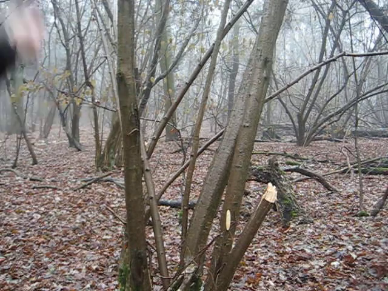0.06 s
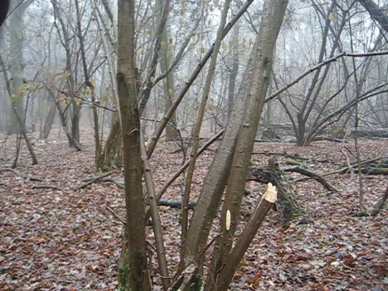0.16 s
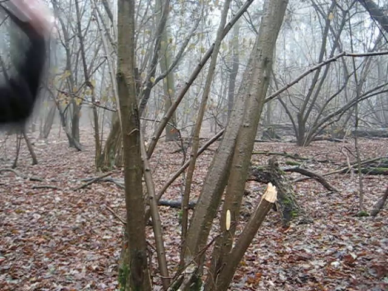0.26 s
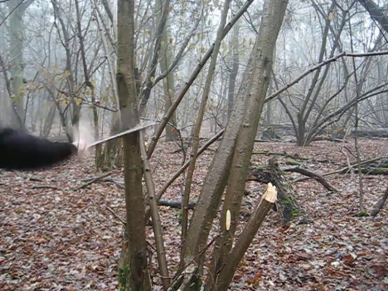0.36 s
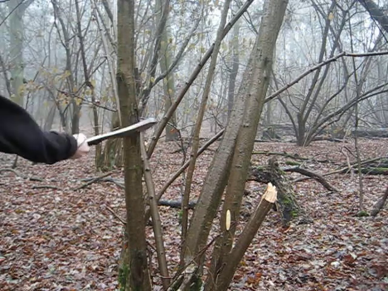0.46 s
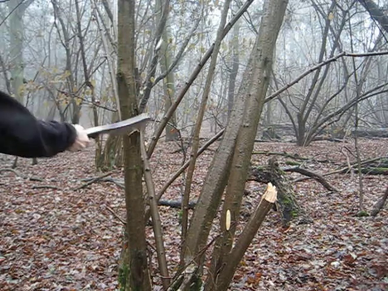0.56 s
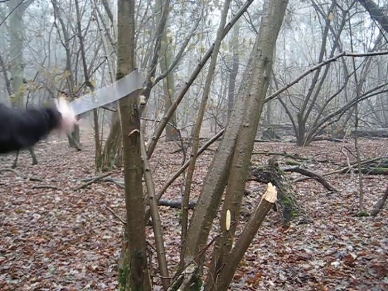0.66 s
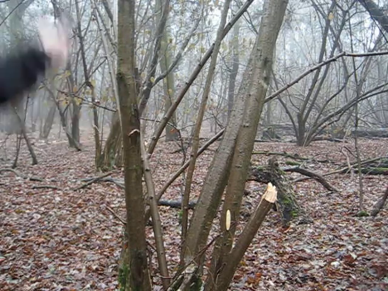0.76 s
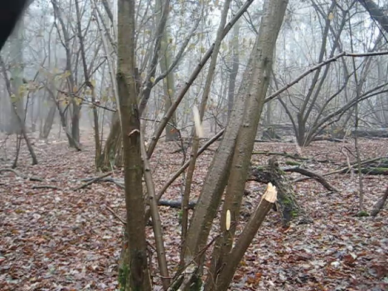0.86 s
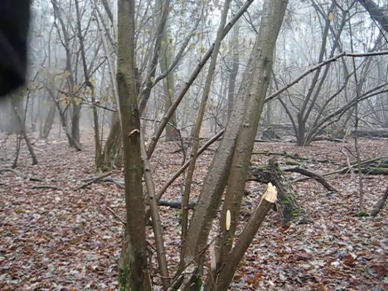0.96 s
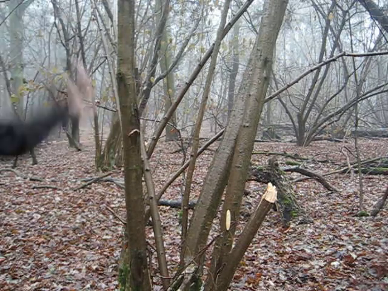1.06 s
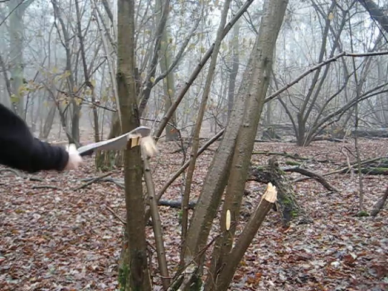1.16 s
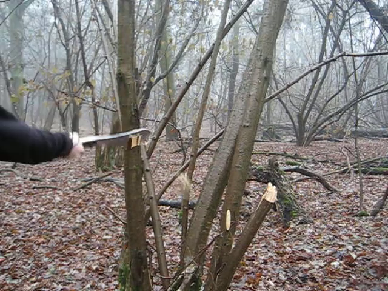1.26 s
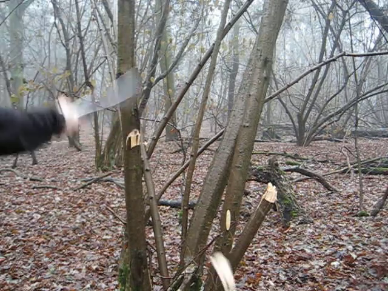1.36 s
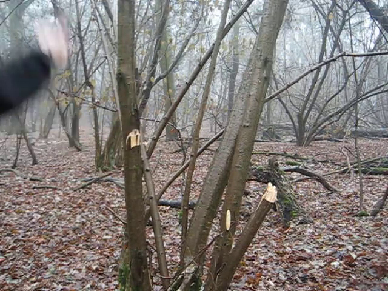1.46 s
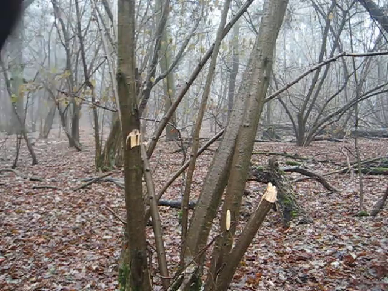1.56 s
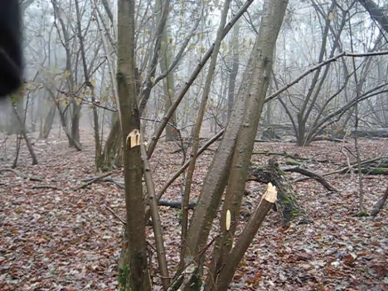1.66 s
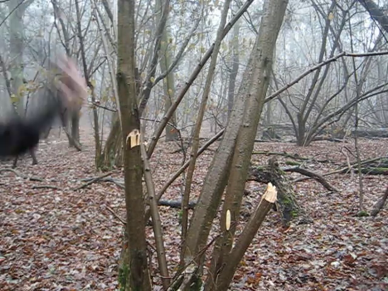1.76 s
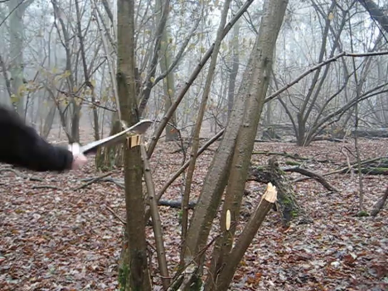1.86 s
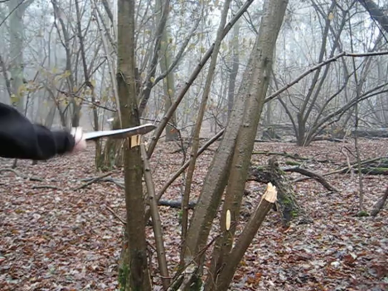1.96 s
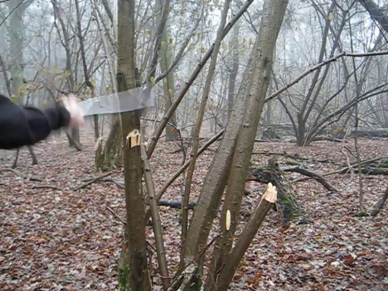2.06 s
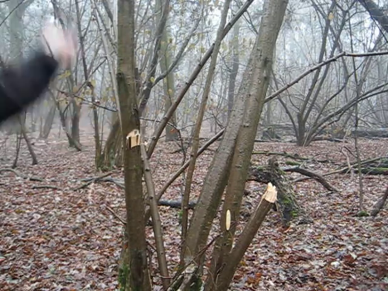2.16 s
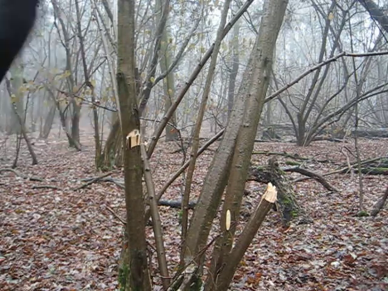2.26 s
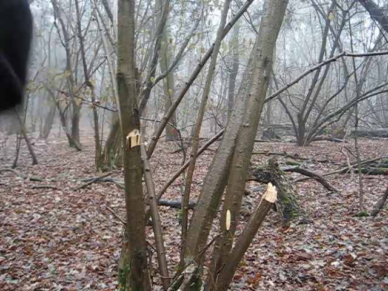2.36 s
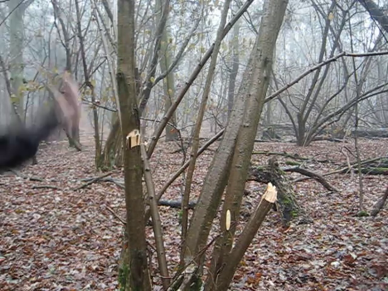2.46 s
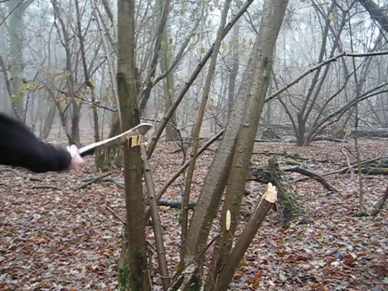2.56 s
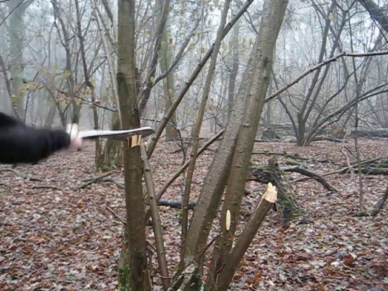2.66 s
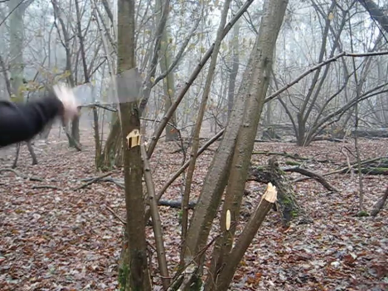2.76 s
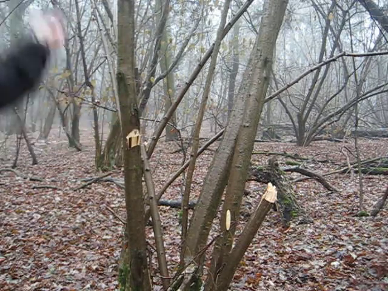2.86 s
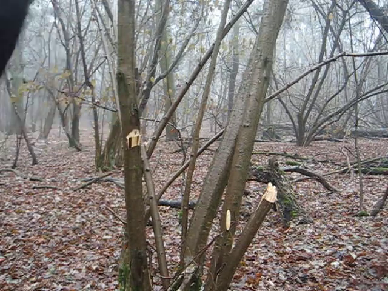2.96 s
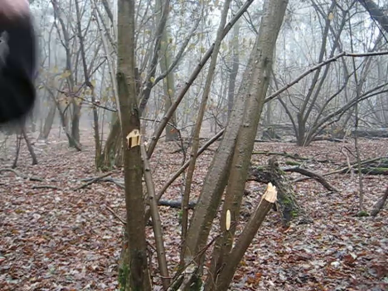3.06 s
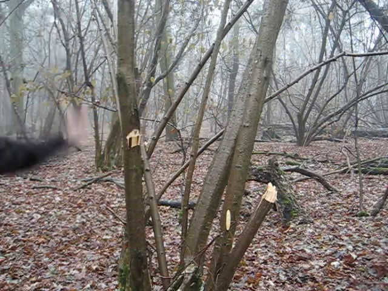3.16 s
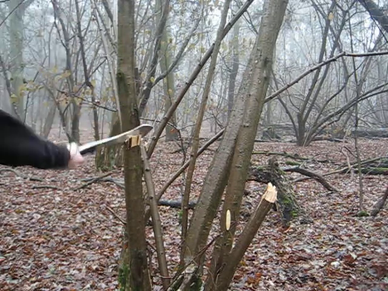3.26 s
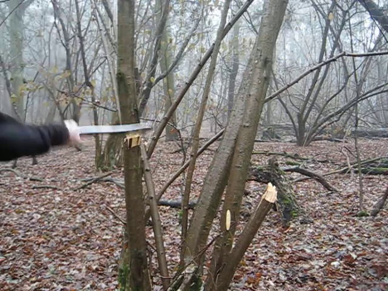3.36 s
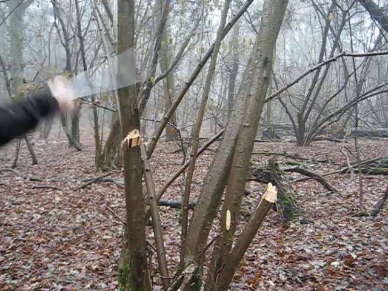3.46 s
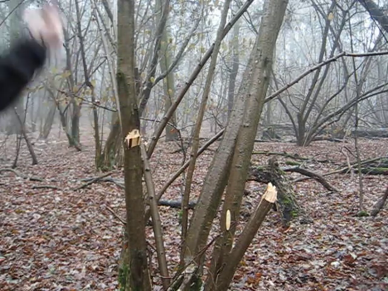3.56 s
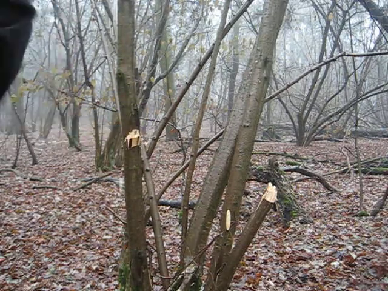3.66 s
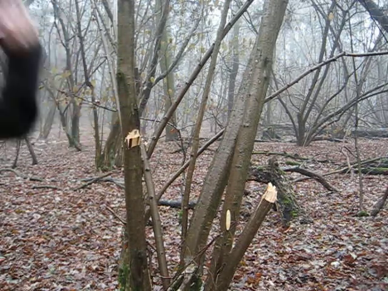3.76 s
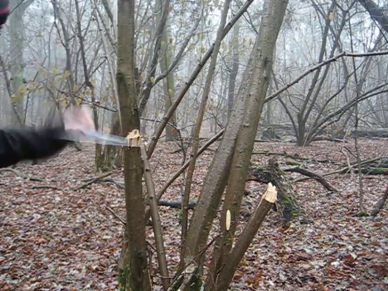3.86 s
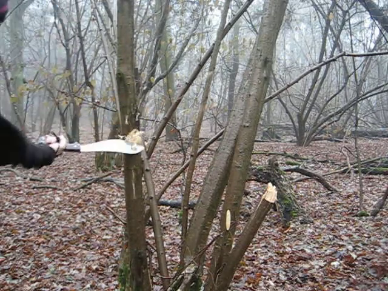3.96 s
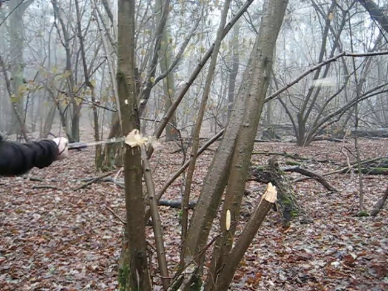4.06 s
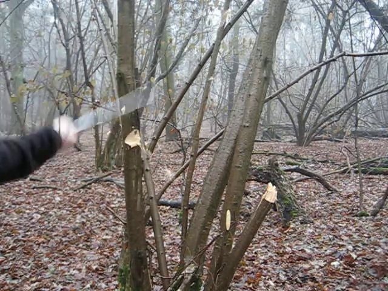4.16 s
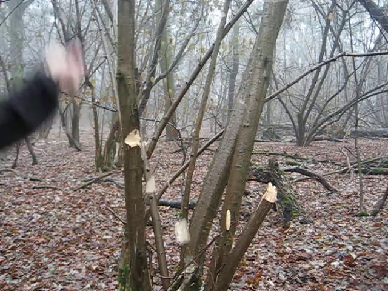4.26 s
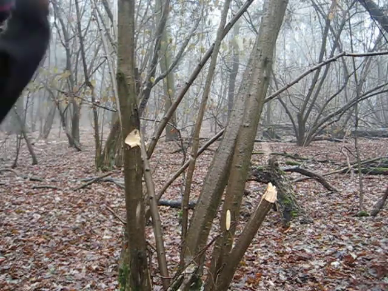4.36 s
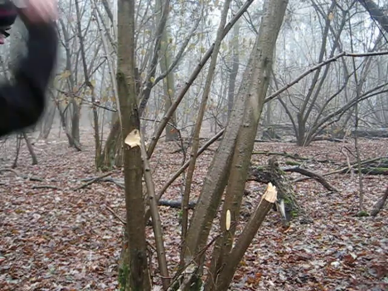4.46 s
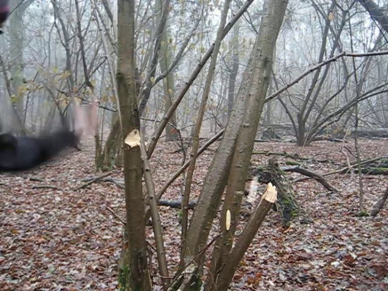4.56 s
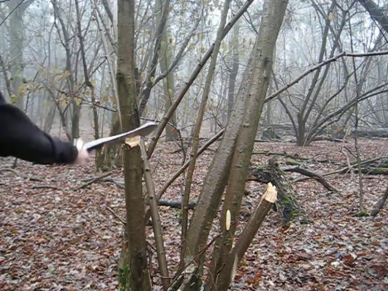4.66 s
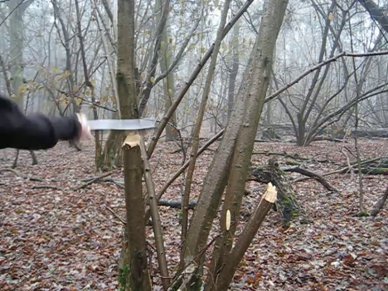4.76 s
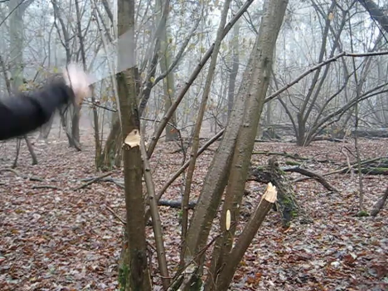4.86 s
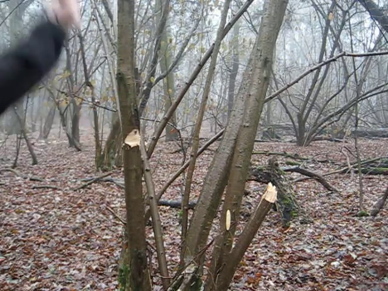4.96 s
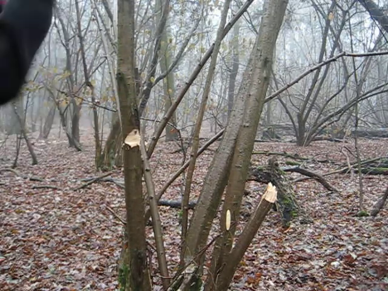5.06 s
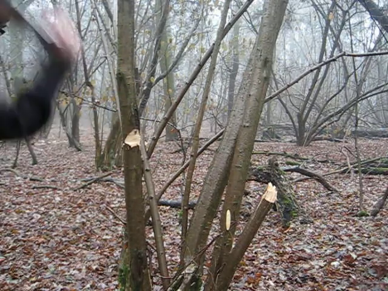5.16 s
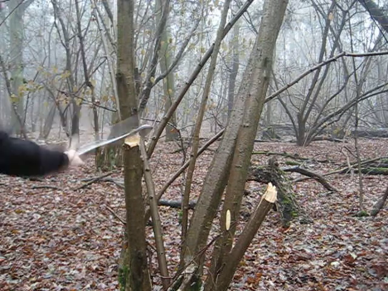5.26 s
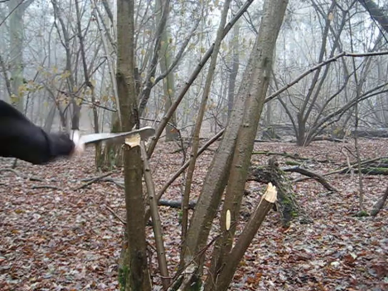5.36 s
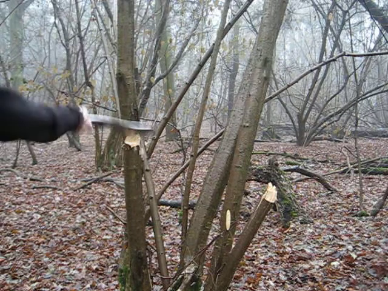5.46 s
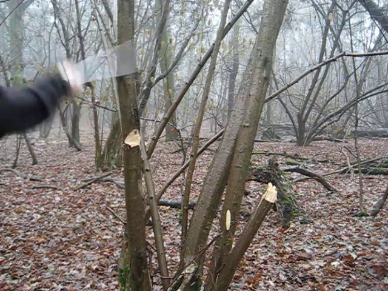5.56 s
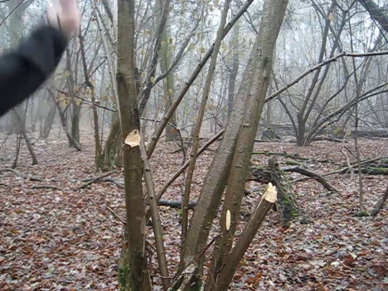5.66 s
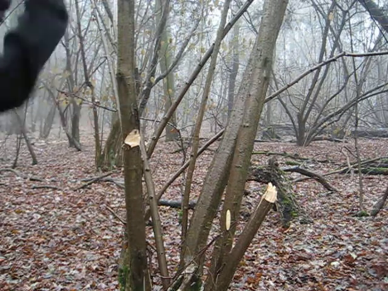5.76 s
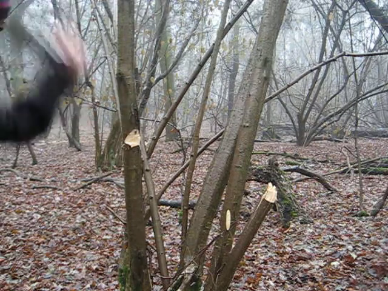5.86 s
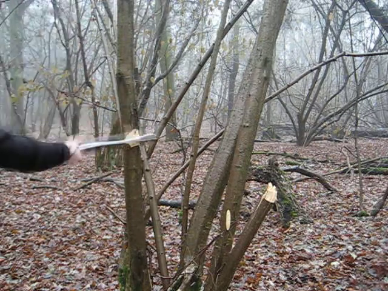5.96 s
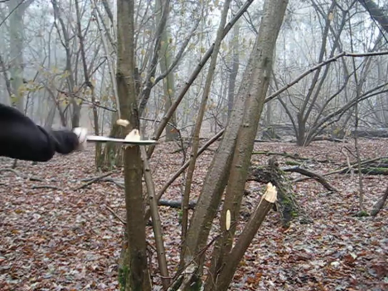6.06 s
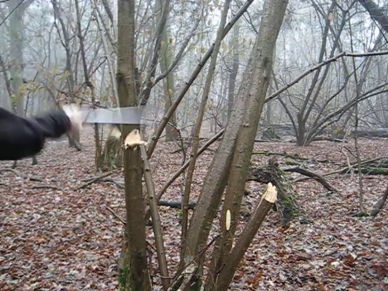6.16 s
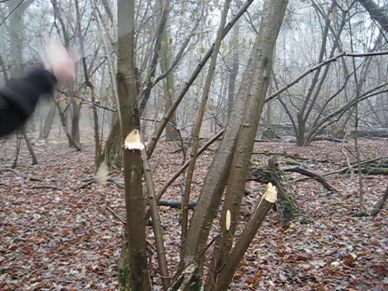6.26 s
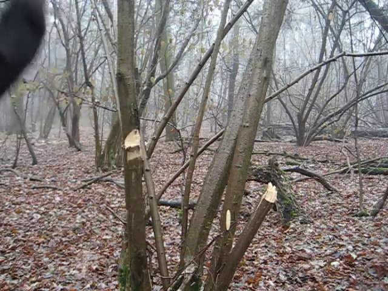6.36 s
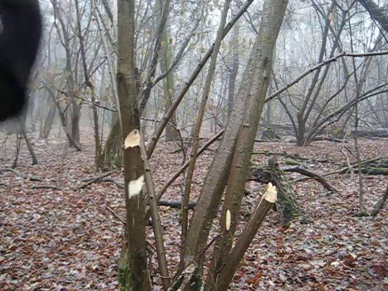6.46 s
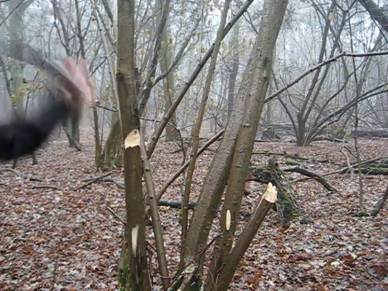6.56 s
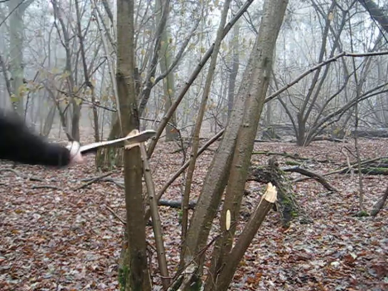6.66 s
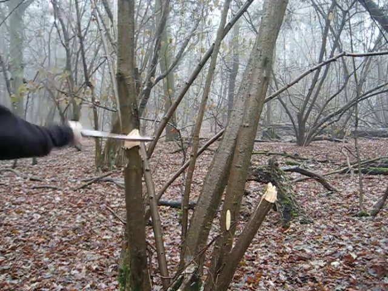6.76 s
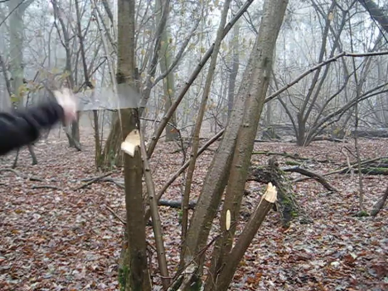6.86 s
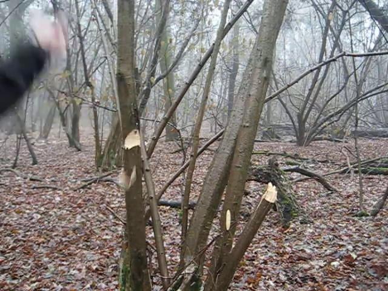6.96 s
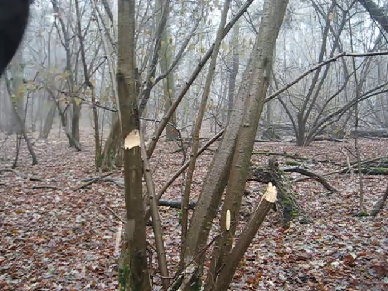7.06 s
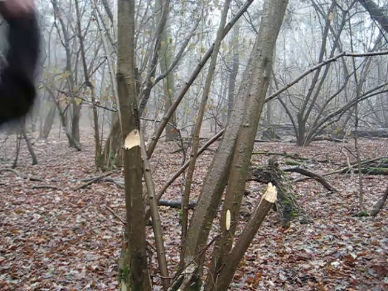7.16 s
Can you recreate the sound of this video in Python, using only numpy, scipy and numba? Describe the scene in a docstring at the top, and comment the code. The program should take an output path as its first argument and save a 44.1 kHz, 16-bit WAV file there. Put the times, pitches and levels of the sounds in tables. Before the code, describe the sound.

Ten hard chops of a long blade into a standing sapling, evenly spaced about 0.7 seconds apart. Each is a short, bright, distorted crack with a woody knock, followed by a hissy echo from surrounding trunks that seems to swell as the small camera microphone recovers. Between blows, drops and chips tick and scuff on dead leaves, over fine dripping patter and a faint far road.

```python
"""Chopping a sapling in a wet wood

A long blade chops a standing sapling in a quiet wood: torn fibres drive resonances, trunks around echo them.
Shaken drops and chips are short noises through leaf resonances, pings on hard things are decaying sines.
Shaped noise far off is a road, and nearer a patter with tiny damped sines in it. The microphone is a small
camera's: it overloads on each blow, cuts its gain and lets it climb back, so the echo seems to swell."""
import sys
import numpy as np
from scipy import signal
from scipy.fft import rfft, irfft, next_fast_len
from scipy.io import wavfile
from scipy.ndimage import uniform_filter1d, map_coordinates
from numba import njit

SR = 44100
rng = np.random.default_rng(int(sys.argv[2]) if len(sys.argv) > 2 else 0)


def unload_wav(signal):
    """Save mono or channel-first audio to the path in sys.argv[1] as 16-bit WAV at rate SR, clipped to [-1, 1]."""
    wavfile.write(
        sys.argv[1],
        SR,
        np.round(np.clip(np.atleast_2d(signal).T, -1, 1) * 32767).astype(np.int16),
    )


N = 318402  # samples

# Blows on the sapling. Each row: start in seconds, time the tear takes to fall 60 dB in seconds,
# thud level in dB, then levels in dB of the deep knock, wood body, hollow ring and bright crack.
BLOWS = [(0.3586, 0.019, -24, -11.5, -13, -34, 0), (1.1004, 0.021, -27, -9.5, -6.5, -11.5, -6.5),
         (1.813, .015, -25, -12.5, -7.5, -11.5, -5.5), (2.5032, 0.027, -37, -18.5, -10, -6, -11),
         (3.1874, 0.016, 3, -10, -4.5, -3, -4.5), (3.902, 0.017, -9, -16, -17.5, -40, -0.5),
         (4.594, 0.022, 5, -14, -1.5, -6.5, -1), (5.255, 0.012, 1.5, -4.5, 1, 2, 0),
         (5.957, 0.017, -29, -12.5, -9, -12.5, -6), (6.6253, 0.014, -38, -5.5, -8, -21, -1)]
# Resonances of the trunk, grouped by the part of the blow that drives them.
# Each row: frequency in Hz, width in Hz, level in dB over that part.
TRUNK_MODES = {"deep": [(720, 600, 0)], "body": [(1500, 1440, 0)], "hollow": [(2020, 270, 0)],
               "bright": [(3400, 1790, -.1), (6300, 4740, -.1), (11000, 6800, -8)]}
# Scatter from the trees around. Each row: frequency in Hz, time to fall 60 dB in seconds.
TREE_DECAY = [(300, 0.22), (1000, 0.5), (2000, 0.93), (4000, 0.63), (8000, 0.72), (14000, 0.68)]
# Louder drops and chips on leaves. Each row: start in seconds, level in dB,
# loudest pitch in octaves over BASE_HZ, time to fall 60 dB in seconds.
LEAF_DROPS = [(0.0214, -20.5, 0.67, 0.0074), (0.0834, -16, 0.73, 0.031), (0.1009, -14, 0.82, 0.017),
              (0.1618, -16, 1.05, 0.014), (0.1895, -23, 1.05, 0.012), (0.2326, -19, 1.3, 0.0076),
              (0.2753, -21, 1.2, 0.014), (0.631, -10.5, 0.63, 0.012), (0.7545, -15.5, 0.82, 0.022),
              (0.842, -15, 0.67, 0.01), (0.8587, -17.5, 0.8, 0.013), (0.9163, -21.5, 1.1, 0.01),
              (0.9555, -20, 1.2, 0.011), (1.2432, -16.5, 1, 0.017), (1.292, -17, 0.91, 0.013),
              (1.5262, -14, 1.7, 0.012), (1.6305, -15, 1.1, 0.021), (1.6525, -22, 0.76, 0.016),
              (1.7882, -12, 0.83, 0.024), (1.9928, -13.5, 1.14, 0.016), (2.098, -22, 1.56, 0.033),
              (2.3012, -16, 1.3, 0.0097), (2.3485, -17.5, 1, 0.01), (2.7067, -16, 0.51, 0.0082),
              (2.756, -26, 0.77, 0.009), (2.7871, -40, 0.8, 0.011), (2.81, -21.5, 0.74, 0.014),
              (2.8449, -22, 0.94, 0.014), (2.8683, -18, 0.77, 0.0099), (2.884, -20, 1.4, 0.014),
              (2.9253, -25, 0.93, 0.014), (2.9435, -25, 0.79, 0.014), (2.9748, -21.5, 0.89, 0.014),
              (3.0108, -16, 0.97, 0.015), (3.472, -23, 1.25, 0.014), (3.5149, -24, 1.7, 0.023),
              (3.6802, -21, 0.9, 0.014), (3.704, -19.5, 0.77, 0.02), (3.7199, -19, 0.98, 0.023),
              (3.7476, -16.5, 1, 0.0076), (3.7973, -19, 0.74, 0.012), (4.1807, -22, 0.97, 0.026),
              (4.2616, -14.5, 0.62, 0.024), (4.331, -22, 1.3, 0.014), (4.3386, -23, 0.9, 0.016),
              (4.349, -15.5, 1.2, 0.033), (4.425, -17, 1.5, 0.014), (4.4327, -3.5, 1.03, 0.012),
              (4.474, -15, 0.94, 0.016), (4.5124, -17, 1.9, 0.0076), (4.8083, -7.5, 1.01, 0.018),
              (4.9353, -17, 0.83, 0.022), (4.9556, -21, 0.92, 0.027), (5.057, -23, 1.25, 0.014),
              (5.1587, -18, 0.53, 0.02), (5.221, -14, 0.93, 0.019), (5.4805, -22, 0.91, 0.014),
              (5.4924, -15, 0.89, 0.021), (5.6648, -21, 0.93, 0.011), (5.8037, -16, 1.03, 0.013),
              (5.877, -21.5, 0.88, 0.026), (5.8924, -22, 0.96, 0.021), (5.9945, -1.5, 0.82, 0.02),
              (6.1252, -19.5, 1.6, 0.012), (6.1887, -23, 1.3, 0.014), (6.2015, -18.5, 0.55, 0.0087),
              (6.3041, -20.5, 0.83, 0.028), (6.329, -25, 1.5, 0.02), (6.349, -28, 1.4, 0.014),
              (6.359, -16.5, 0.54, 0.017), (6.376, -22.5, 1.5, 0.02), (6.4103, -22, 1.3, 0.014),
              (6.555, -8, 0.74, 0.029), (6.571, -15, 0.97, 0.012), (6.5863, -20, 0.87, 0.023),
              (6.5949, -22, 0.95, 0.019), (6.6434, -20, 1.05, 0.014), (6.9314, -16.5, 1.3, 0.017),
              (6.993, -19, 0.81, 0.033), (7.0317, -21, 1.3, 0.023), (7.0929, -13.5, 0.98, 0.024),
              (7.154, -15, 1.14, 0.017), (7.206, -19, 1.5, 0.014)]
# Chips sliding through the litter. Each row: start in seconds, level in dB,
# loudest pitch in octaves over BASE_HZ, length in seconds before the fade.
CHIP_SCUFFS = [(.059, -29.5, 0.63, 0.024), (0.182, -26.5, 0.96, 0.014), (0.276, -27.5, 1.4, 0.0093),
               (0.995, -32.5, 1.3, 0.043), (1.524, -18, 0.81, 0.018), (1.543, -26.5, 0.78, .035),
               (2.483, -26, 0.81, 0.0022), (3.154, -38, 1.7, 0.019), (4.332, -28, 1.2, 0.023),
               (4.581, -24, 0.65, .012), (6.554, -21, 0.91, 0.013)]
# Resonances of the dead leaves. Each row: frequency in Hz, width in Hz.
LEAF_MODES = [(3500, 7750), (7000, 3800), (11500, 8800)]
# Drops landing on something hard. Each row: start in seconds, which thing,
# level in dB of its low mode, level in dB of its high mode.
HARD_LANDINGS = [(.253, "a", -45, -32), (0.273, "b", -22, -27), (.805, "a", -39, -37),
                 (.917, "a", -57, -34), (.955, "a", -51, -32), (1.002, "b", -22, -29),
                 (1.650, "b", -55, -40), (2.206, "a", -33, -26.5), (2.208, "b", -34, -50),
                 (4.376, "b", -55, -30), (6.224, "b", -26, -35), (6.226, "a", -50, -31),
                 (6.297, "b", -31, -55), (6.521, "b", -41, -55), (6.934, "b", -28, -50)]
# Two hard things, two modes each. Each row: frequency in Hz, time to fall 60 dB in seconds.
HARD_MODES = {"a": [(6400, .045), (11200, .04)], "b": [(7700, .05), (12900, .045)]}
# Spectrum of the far road. Each row: frequency in Hz, relative density in dB per Hz.
ROAD_SPECTRUM = [(15, -52), (25, -31), (80, -15), (149, -18), (418, -11), (452, -11), (1000, -1.5),
                 (1240, -6), (1450, -8.5), (1600, -10.5), (2600, -29), (3380, -42), (5720, -120)]
# Spectrum of the dripping hiss. Each row: frequency in Hz, relative density in dB per Hz.
PATTER_SPECTRUM = [(1200, -10), (2000, 3), (3500, 3), (6000, 0), (8500, 2), (11000, -7.5), (14000, -6),
                   (15700, -12), (15950, -90)]
# Level of the hiss and patter; the loud start is the dying echo of an earlier blow.
# Each row: time in seconds, level in dB.
PATTER_LEVEL = [(0, -34.5), (.33, -34.5), (0.701, -39), (1.4, -43), (1.7, -39), (2.1, -43.5), (2.6, -42),
                (4, -43), (4.5, -39), (5.2, -43), (7.22, -40)]
# Camera electronics, ahead of the gain control. Each row: frequency in Hz, rms level in dB.
WHINE_TONES = [(15121, -60), (15150, -58)]
# Treble loss after the amplifier. Each row: frequency in Hz, gain in dB.
CAMERA_TREBLE = [(20, 0), (11000, 0), (14000, -4), (15700, -10), (16900, -22)]

TEAR_DB, ECHO_DB = 19, -13.5  # the tear, and the wood's answer; both ahead of the trunk resonances
KNOCK_DB, KNOCK_T60_S = 1, .07  # ring of the stem: level over the deep knock, time to fall 60 dB
BASE_HZ, OFF_PITCH_DB = 3000, 9.5  # loss of a leaf resonance one octave from the loudest pitch
FAINT_DB, FAINT_SPREAD_DB, FAINT_T60_S = -21, 5.5, 0.009  # loudest, spread below it, median decay
ROAD_DB = -35.5
TOP_HZ = 16984  # top of the band: nothing sounds above this


def amp(db):
    """dB to gain."""
    return 10 ** (np.asarray(db) / 20)


def unit(x):
    """Scaled to rms 1."""
    return x / np.sqrt(np.mean(x ** 2) + 1e-20)


def along(points, hz):
    """Values between (Hz, value) points, read on a log frequency axis."""
    f, v = np.transpose(points)
    return np.interp(np.log(hz + 1), np.log(f + 1), v)


def filtered(x, response):
    """x times a complex response of frequency, padded to keep ringing from wrapping round."""
    m = next_fast_len(x.shape[-1] + 8192)
    spectrum = rfft(x, m) * response(np.fft.rfftfreq(m, 1 / SR))
    return irfft(spectrum, m)[..., :x.shape[-1]]


def resonance(hz, width):
    """A causal resonance that leaves white noise at its rms."""
    gain = np.sqrt(SR / (np.pi * width))
    return lambda f: gain * 1j * f * width / (hz * hz - f * f + 1j * f * width)


def add(track, s, sound):
    """Mixes sound into track from second s."""
    part = track[round(s * SR):][:len(sound)]
    part += sound[:len(part)]


def chops():
    """Fibres tear for a few ms and drive the trunk resonances; the wood answers in the same colour."""
    out, t = np.zeros(N), np.arange(SR) / SR
    for s, length, thud_db, *part_db in BLOWS:
        colour = trunk_colour(part_db)
        onset = 1 - np.exp(-t / 0.0011)
        tear = amp(TEAR_DB - 60 * (t / length) ** 1.046) * onset * rng.standard_normal(SR)
        thud = amp(thud_db - 60 * t / 0.014) * np.sin(2 * np.pi * 120 * t)
        # the stem rings on briefly
        knock_env = amp(part_db[0] + KNOCK_DB - 60 * t / KNOCK_T60_S)
        knock = knock_env * np.sin(2 * np.pi * 760 * t + 3 * rng.random())
        blow_and_echo = filtered(tear + amp(ECHO_DB) * echo_tail(), colour)
        add(out, s, blow_and_echo + thud + knock)
    return out


def trunk_colour(part_db):
    """Response of the struck trunk: its resonances summed with alternating sign."""
    modes = [(hz, width, db + drive_db)
             for drive_db, part in zip(part_db, TRUNK_MODES.values())
             for hz, width, db in part]
    return lambda f: sum((-1) ** k * amp(db) * resonance(hz, width)(f)
                         for k, (hz, width, db) in enumerate(modes))


def echo_tail():
    """Scatter from many trunks: it builds up, then each frequency dies at its own speed."""
    hz, t, z = signal.stft(rng.standard_normal(SR), SR, nperseg=256)
    build_up = 1 - np.exp(-(t / 0.087) ** 2)
    far = amp(-60 * t / along(TREE_DECAY, hz)[:, None]) * build_up
    near = amp(3.5 - 60 * t / 0.14)  # ground and neighbouring stems
    lumps = amp(0.45 * rng.standard_normal(len(t)))  # single trunks stand out
    return signal.istft(z * lumps * (far + near), SR, nperseg=256)[1][:SR]


def litter():
    """A drop is a snap with a crackling puff, a scuff a held crackle; both sound through the leaves."""
    tracks = np.zeros((len(LEAF_MODES), N))
    drops = list(LEAF_DROPS) + faint_drops(count=120)
    shapes = [drop_shape(t60) for *_, t60 in drops]
    shapes += [scuff_shape(length) for *_, length in CHIP_SCUFFS]
    for (s, db, octaves, _), shape in zip(drops + list(CHIP_SCUFFS), shapes):
        for track, (hz, _) in zip(tracks, LEAF_MODES):
            add(track, s, amp(db + off_pitch(hz, octaves)) * shape)
    return sum((-1) ** k * filtered(track, resonance(*mode))
               for k, (track, mode) in enumerate(zip(tracks, LEAF_MODES)))


def drop_shape(t60):
    """The impact is a very short pulse, the puff behind it decaying noise."""
    t = np.arange(SR // 10) / SR
    snap = 2.6 * np.exp(-((t - .0002) / .00004) ** 2)
    return snap + amp(-60 * t / max(t60, .003)) * rng.standard_normal(len(t))


def scuff_shape(length):
    """Sliding is noise whose level jumps every 30 samples, held for its length and then fading."""
    t = np.arange(SR // 10) / SR
    fade_db = -60 * np.maximum(t - length, 0) / 0.047
    jumps_db = 5.2 * rng.standard_normal(len(t) // 30).repeat(repeats=30)
    return amp(fade_db + jumps_db) * rng.standard_normal(len(t))


def off_pitch(hz, octaves):
    """dB lost by a leaf resonance away from the pitch that is excited most."""
    return -OFF_PITCH_DB * (np.log2(hz / BASE_HZ) - octaves) ** 2


def faint_drops(count):
    """Rows as in LEAF_DROPS at random times, of random size, pitch and decay."""
    u, g = rng.random((count, 2)), rng.standard_normal((count, 2))
    start = u[:, 0] * N / SR
    db = FAINT_DB + FAINT_SPREAD_DB * np.log(1 - u[:, 1])
    octaves = 1.32 + 0.45 * g[:, 0]
    t60 = FAINT_T60_S * np.exp(1.2 * g[:, 1])
    return list(zip(start, db, octaves, t60))


def pings():
    """Each landing rings two modes of a hard thing, each as two slightly detuned decaying sines."""
    out, t = np.zeros(N), np.arange(SR // 10) / SR
    for s, thing, *mode_db in HARD_LANDINGS:
        for db, (hz, t60) in zip(mode_db, HARD_MODES[thing]):
            split, turn = rng.normal(0, .02, 2), rng.random(2)  # detuning ratio, phase in turns
            pair = np.sin(2 * np.pi * (np.outer(1 + split, hz * t) + turn[:, None]))
            add(out, s, amp(db - 60 * t / t60) * pair.sum(0))
    return out


def air():
    """A far road, as shaped noise, under the hiss and patter of dripping branches."""
    road = unit(filtered(patchy(patchy_db=1.0), lambda f: amp(along(ROAD_SPECTRUM, f))))
    hiss = unit(filtered(patchy(patchy_db=.8), lambda f: amp(along(PATTER_SPECTRUM, f))))
    # a smooth random level, one new value every 200 samples
    wander = map_coordinates(rng.standard_normal(N // 200 + 2), [np.arange(N) / 200])
    crackle = unit(amp(3 * wander))
    ticks = grains(count=3000, centre_hz=6000, spread=.45, cycles=1.5, size_db=13)
    patter_db = np.interp(np.arange(N) / SR, *np.transpose(PATTER_LEVEL))
    patter = crackle * hiss + amp(-7.0) * ticks
    return amp(ROAD_DB) * road + amp(patter_db) * patter


def grains(count, centre_hz, spread, cycles, size_db):
    """Many tiny far drops: damped sines of random pitch and size."""
    u, g = rng.random((count, 2)), rng.standard_normal(count)
    hz = np.clip(centre_hz * np.exp(spread * g), 1500, 15000)[:, None]
    k = np.arange(128)
    size = amp(size_db * u[:, 1:] ** 2)
    wave = size * np.sin(2 * np.pi * hz * k / SR) * np.exp(-k * hz / SR / cycles)
    place = (u[:, :1] * N).astype(int) + k
    return unit(np.bincount(place.ravel(), wave.ravel(), N + len(k))[:N])


def patchy(patchy_db):
    """White noise with patches of random gain over time and frequency."""
    z = signal.stft(rng.standard_normal(N + 512), nperseg=512)[2]
    field = uniform_filter1d(rng.standard_normal(z.shape), size=6, axis=0)
    field = uniform_filter1d(field, size=10, axis=1)
    return signal.istft(z * amp(patchy_db * unit(field)), nperseg=512)[1][:N]


def scene():
    """Everything in the wood, as it reaches the microphone."""
    return (chops() + litter() + pings() + air())[None]


@njit
def gain_cut(over_db, attack, hold, release):
    """dB taken off: grows fast while the level is over the limit, holds, then shrinks evenly."""
    cut, now, wait = np.zeros(len(over_db)), 0., 0.
    for i in range(len(over_db)):
        if over_db[i] > now:
            now, wait = min(now + attack, over_db[i]), hold
        elif wait > 0:
            wait -= 1
        else:
            now = max(now - release, 0.)
        cut[i] = now
    return cut


def soft_clip(x, limit, sharpness):
    """Overload: small signals pass, large ones flatten towards the limit."""
    return x / (1 + np.abs(x / limit) ** sharpness) ** (1 / sharpness)


def record(dry):
    """Whine, gain control, overload, treble loss and rumble of the camera, then a band limit."""
    t = np.arange(N) / SR
    whine = sum(amp(db) * np.sqrt(2) * np.sin(2 * np.pi * hz * t) for hz, db in WHINE_TONES)
    x = dry[0] + whine
    power = uniform_filter1d(x ** 2, size=132, origin=65)  # over the last 3 ms
    level_db = 10 * np.log10(np.abs(power) + 1e-12)
    limit_db, hold_s = -7.5, 0.052
    attack_db, release_db = 2800, 130  # per second
    x = x * amp(-gain_cut(level_db - limit_db, attack_db / SR, hold_s * SR, release_db / SR))
    x = soft_clip(x, limit=.7, sharpness=4)
    x = filtered(x, lambda f: amp(along(CAMERA_TREBLE, f)))
    rumble = unit(filtered(rng.standard_normal(N), resonance(67, 123)))  # of the output stage
    x = soft_clip(x + amp(-58.0) * rumble, limit=.74, sharpness=12)
    return filtered(x, lambda f: f < TOP_HZ)[None]


dry = scene()
out = record(dry)
unload_wav(out)
```